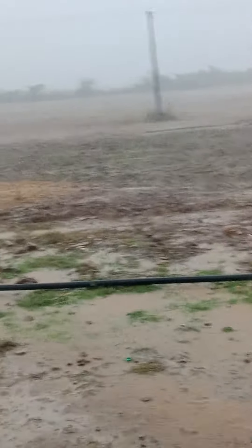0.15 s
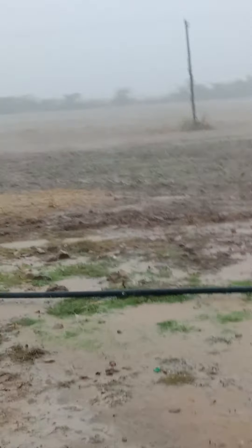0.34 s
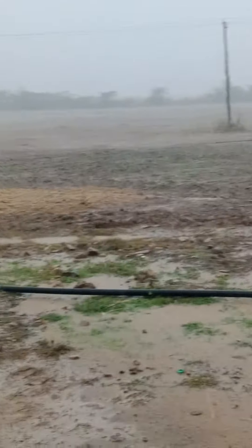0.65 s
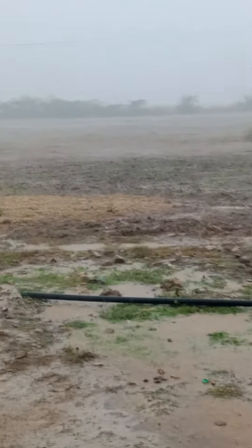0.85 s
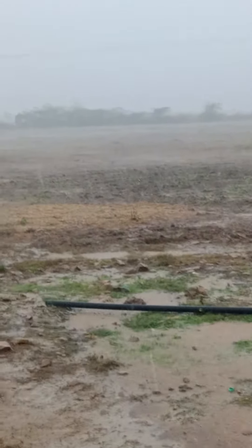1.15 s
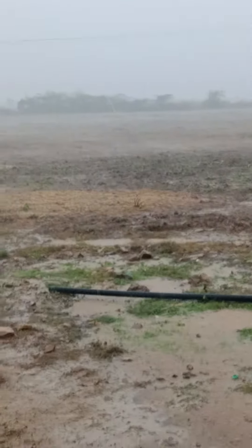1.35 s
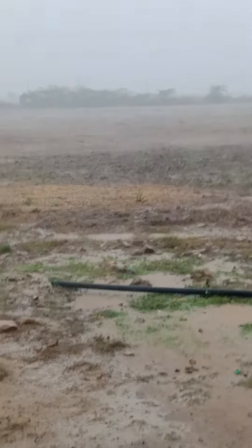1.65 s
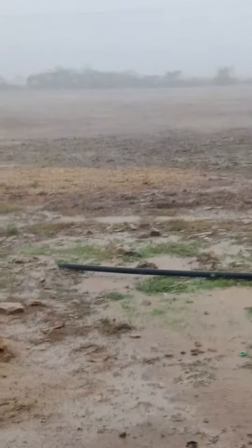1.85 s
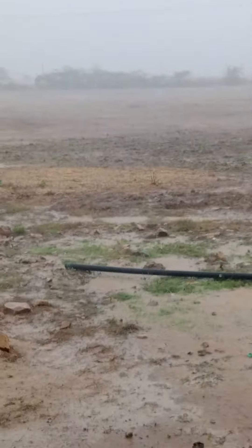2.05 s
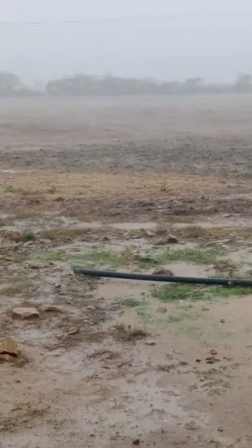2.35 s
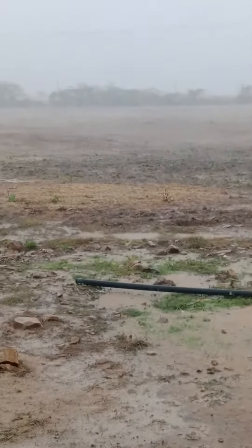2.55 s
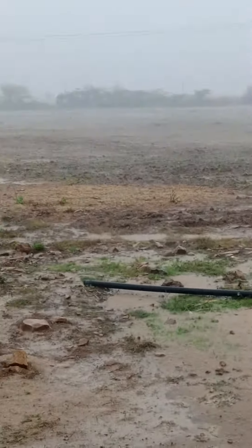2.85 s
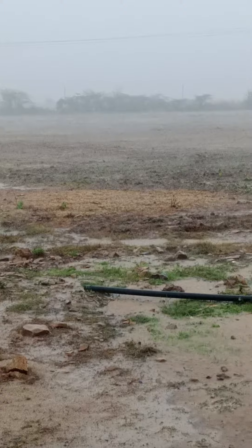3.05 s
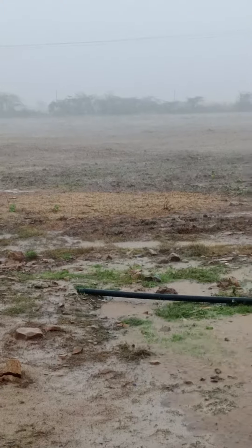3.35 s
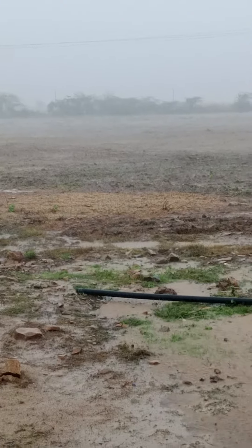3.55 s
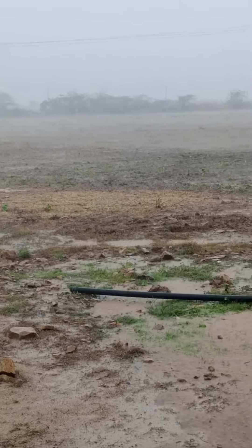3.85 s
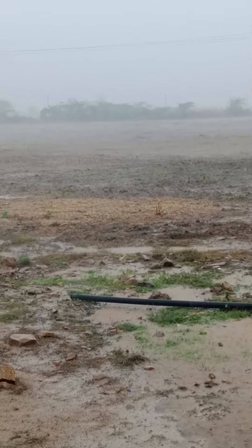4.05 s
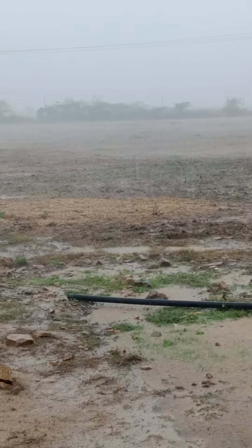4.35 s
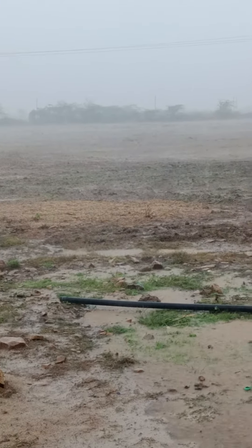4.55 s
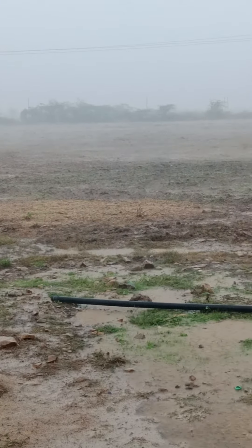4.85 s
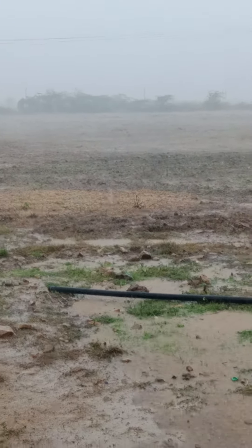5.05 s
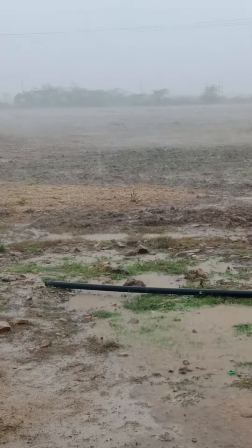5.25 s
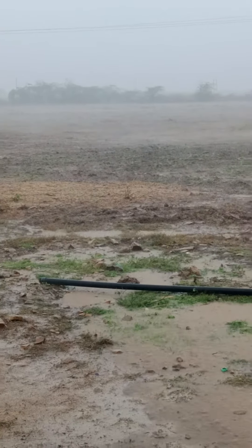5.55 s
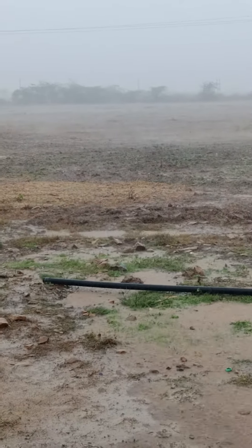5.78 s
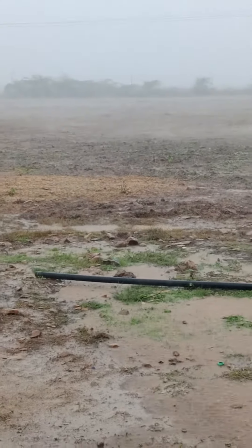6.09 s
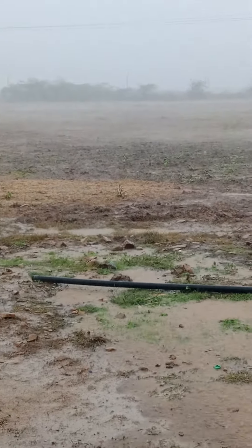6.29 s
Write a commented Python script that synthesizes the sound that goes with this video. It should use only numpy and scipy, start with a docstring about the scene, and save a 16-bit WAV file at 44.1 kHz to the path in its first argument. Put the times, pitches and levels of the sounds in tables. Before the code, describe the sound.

Heavy rain falls on an open, muddy field, countless drops ticking on wet soil and blurring into a bright hiss, with a watery wash farther off. A few drops crack close by and others splat softly into puddles. Wind hits the handheld microphone in short, low bursts, hardest in the first second, again around two seconds in, and once more near the end.

```python
"""A muddy field in heavy rain, on a handheld recorder. Countless drops tick on wet soil and blur into hiss, and
a patchy wash, its bands flicking between loud and soft, fills the middle range. Close to the microphone a few
drops crack and others splat into puddles. Eddies of wind hit the microphone port in short low gusts."""
import sys
import numpy as np
from scipy import signal
from scipy.fft import rfft, irfft, next_fast_len
from scipy.io import wavfile
from scipy.ndimage import uniform_filter1d, map_coordinates

SR = 44100
rng = np.random.default_rng(int(sys.argv[2]) if len(sys.argv) > 2 else 0)


def generate_wav(signal):
    """Clip the signal to [-1, 1] and save it as 16-bit WAV at the path in sys.argv[1]."""
    frames = np.transpose(np.atleast_2d(signal))
    scaled = np.clip(frames, -1, 1) * 32767
    pcm = np.round(scaled).astype(np.int16)
    wavfile.write(sys.argv[1], SR, pcm)


N = 283122

# The downpour. Each row: time in seconds, patter level in dB, wash in dB relative to the patter.
DOWNPOUR = [(0.0, -42.5, -12.5), (0.29, -40.5, -13), (1.14, -41, -14), (1.5, -37, -15),
            (1.84, -39.5, -13.5), (2.5, -36.5, -14.5), (2.75, -38, -14), (3.31, -38, -15), (3.93, -41, -14),
            (4.61, -40, -13.5), (5.38, -35.5, -15), (5.65, -36, -14.5), (6.42, -39, -13.5)]
# Colour of the wash. Each row: frequency in Hz, relative gain in dB.
WASH_COLOUR = [(500, -43), (750, -10.5), (1000, -3), (1300, -1), (1800, -8), (2100, -3.5), (2900, -3),
               (3250, -20), (4400, -25.5), (4900, -50)]
# Colour of the soaked field's low murmur. Each row: frequency in Hz, relative gain in dB.
MURMUR_COLOUR = [(30, -19), (70, 5.5), (150, 1), (350, -3), (700, -6.5), (1500, -17), (3000, -11.5),
                 (4000, -33.5), (4800, -67.5)]
# Colour of the hiss's lower edge. Each row: frequency in Hz, relative gain in dB.
EDGE_COLOUR = [(4300, -56), (4800, -34), (5500, -7.5), (6200, 2.5), (6600, -14), (7200, -30)]
# Gusts on the microphone port. Each row: start in seconds, length in seconds, level in dB ahead of
# the port and bass cut, treble loss in dB per 100 Hz (sign ignored).
PORT_GUSTS = [(0.003, 0.015, -9.5, 3.5), (0.034, 0.033, -17, 6), (0.084, 0.09, -29.5, 20.5),
              (.2, 0.048, -30, 8), (0.248, .07, -35, 15), (0.323, 0.071, -36.5, 14.5),
              (0.405, 0.16, -48, 25), (0.569, 0.03, -19, 7.5), (0.589, 0.049, -14, 3.5),
              (0.61, 0.0095, -13, 1.05), (0.653, 0.025, -21, 3), (.669, 0.034, -15.5, 3.5),
              (0.7, .049, -21, 4), (.727, .044, -20, 7.5), (0.74, 0.0099, -20, 1.5), (.8, .075, -39, 14),
              (.869, .055, -39.5, 24), (1.191, 0.12, -41, 37), (1.301, 0.048, -33, 10.5),
              (1.344, 0.15, -26, 10), (1.595, 0.058, -28, 12), (1.666, .047, -38, 12.5),
              (1.729, 0.084, -30.5, 10), (1.828, 0.034, -31.5, 10), (1.876, 0.07, -31, 15),
              (1.916, 0.1, -29, 9), (2.006, 0.066, -26.5, 8), (2.068, .037, -28, 9.5),
              (2.091, .11, -38, 10), (2.231, 0.085, -21.5, 7), (2.233, 0.059, -36.5, -0.5),
              (2.315, 0.08, -25.5, 8), (2.411, 0.079, -26.5, 8), (2.486, 0.077, -31, 14.5),
              (2.596, 0.077, -35.5, 12), (2.744, 0.092, -26.5, 29), (2.923, .044, -35.5, 21),
              (2.996, 0.1, -49.5, 9), (3.271, 0.067, -32.5, 16), (3.583, 0.066, -25.5, 9),
              (3.727, 0.076, -40.5, 32), (3.805, .042, -48, 8), (3.877, 0.05, -45.5, 17),
              (4.062, 0.056, -39.5, 11), (4.153, 0.066, -47.5, 24), (4.435, .037, -39.5, 24.5),
              (4.871, 0.077, -34.5, 9), (5.11, .05, -45, 18), (5.151, 0.055, -24.5, 5.5),
              (5.21, .06, -37, 12), (5.27, 0.043, -22.5, 11), (5.303, 0.17, -30.5, 7.5),
              (5.436, 0.093, -29.5, 11.5), (5.523, 0.099, -18.5, 5.5), (5.551, .045, -31, 0.5),
              (5.633, 0.078, -27.5, 11.5), (5.703, 0.058, -30, 13), (5.757, .11, -37, 18),
              (6.194, 0.067, -41.5, 18)]
# Splats in puddles close by. Each row: start in seconds, gain in dB, pitch in Hz.
PUDDLE_SPLATS = [(0.0564, -31.5, 2560), (0.262, -38.5, 2320), (2.2202, -36, 2600), (2.514, -37.5, 2220),
                 (3.355, -38, 2900), (5.759, -43, 2560), (5.822, -40, 2700), (5.841, -35, 2430),
                 (5.919, -43, 2210)]
# Drops near the microphone. Each row: start in seconds, gain in dB ahead of the patter's colour.
NEAR_DROPS = [(0.0649, -25.5), (0.1892, -30), (0.2279, -22.5), (0.399, -17.5), (0.483, -14.5),
              (0.4877, -21.5), (0.5782, -25), (0.637, -24.5), (0.9118, -24), (1.57, -23), (1.999, -16),
              (2.2199, -23), (2.4678, -25), (2.5132, -20.5), (2.6138, -17), (2.6828, -18.5),
              (3.1612, -23.5), (3.2274, -23.5), (3.2721, -22), (3.358, -21.5), (3.499, -26.5),
              (3.7638, -23.5), (3.893, -20.5), (3.9424, -23.5), (4.151, -20), (4.2487, -28), (4.445, -27.5),
              (4.48, -22), (4.6905, -23.5), (4.7743, -22.5), (4.9451, -20.5), (5.2446, -26), (5.55, -14),
              (5.5903, -17), (5.7892, -20.5), (6.3362, -17.5)]
# Colour of the patter through the microphone, which falls away steeply below 6 kHz. Each row: frequency in Hz,
# relative gain in dB.
PATTER_COLOUR = [(3000, -68), (4790, -47), (5490, -23), (6100, -20), (6540, -4.5), (7450, -1.5), (8600, -3),
                 (9350, -6.5), (10200, 1.5), (11500, -2.5), (12700, 2.5), (13900, -4.5), (15100, 0.5),
                 (16000, -4.5)]


def amp(db):
    """Gain of a level in dB."""
    return 10 ** (np.asarray(db) / 20)


def unit(x):
    """Scaled to rms 1."""
    return x / np.sqrt(np.mean(x ** 2) + 1e-20)


def filtered(x, response):
    """x through a filter given as gain against frequency in Hz."""
    size = next_fast_len(len(x) + 4096)
    return irfft(rfft(x, size) * response(np.fft.rfftfreq(size, 1 / SR)), size)[:len(x)]


def colour(points):
    """Response through (Hz, dB) points on a log frequency axis."""
    point_hz, db = np.transpose(points)
    return lambda hz: amp(np.interp(np.log(hz + 1), np.log(point_hz), db))


def wobble(rate):
    """A smooth random curve, rate knots a second."""
    return map_coordinates(rng.standard_normal(int(N * rate / SR) + 4), [np.arange(N) * rate / SR])


def patchy_noise(depth_db, band_hz, patch_s, abrupt):
    """Noise whose bands drift in gain, each on its own; abrupt ones flick between loud and soft."""
    hz, t, spectrum = signal.stft(rng.standard_normal(N), SR, nperseg=1024, noverlap=768)
    bands, patches = np.meshgrid(np.round(hz / band_hz), t / patch_s, indexing="ij")
    drift = map_coordinates(rng.standard_normal((200, 400)), [bands, patches], mode="wrap")
    gain = amp(depth_db * unit(np.tanh(abrupt * drift)))
    return signal.istft(spectrum * gain, SR, nperseg=1024, noverlap=768)[1][:N]


def splash(decay_s, noise):
    """One impact: a burst of noise that falls 60 dB in decay_s."""
    return noise * amp(-60 * np.arange(noise.shape[-1]) / SR / decay_s)


def downpour_db(column=1):
    """One column of the downpour per sample: 1 is the patter, 2 the wash relative to it."""
    rows = np.array(DOWNPOUR)
    return np.interp(np.arange(N) / SR, rows[:, 0], rows[:, column])


def gated_wash():
    """A patchy wash: narrow bands come and go with a watery flicker over an even murmur."""
    flicker = patchy_noise(depth_db=6.0, band_hz=119.85, patch_s=0.07, abrupt=1.7)
    wash = unit(filtered(flicker, colour(WASH_COLOUR)))
    murmur = amp(-10) * unit(filtered(rng.standard_normal(N), colour(MURMUR_COLOUR)))
    return amp(downpour_db() + downpour_db(column=2) + 0.56 * wobble(3)) * (wash + murmur)


def hiss_edge(below_patter_db=25):
    """Faint behind the patter, the lower edge of the hiss flickers band by band."""
    fizz = patchy_noise(depth_db=16.0, band_hz=198.0, patch_s=0.044, abrupt=3.2)
    level_db = downpour_db() - below_patter_db + 0.97 * wobble(6)
    return amp(level_db) * unit(filtered(fizz, colour(EDGE_COLOUR)))


def wind_on_port(rise_share=0.42, bass_cut_hz=95, port_hz=1800):
    """Gusts on the microphone are packets of eddies: low pressure noise, brighter when air hits hard."""
    out = np.zeros(N + 2 * SR)
    t = np.arange(-SR // 2, SR // 2) / SR
    for start, length, db, loss_db in PORT_GUSTS:
        rise, fall = rise_share * length, (1 - rise_share) * length
        rumble = lambda hz: amp(-abs(loss_db) * hz / 100) / np.sqrt(1 + (65 / (hz + 1)) ** 4)
        # the turbulence comes in fits a few milliseconds long
        fits = amp(2.32 * np.repeat(rng.standard_normal(SR // 300), 300))
        eddies = unit(filtered(fits * rng.standard_normal(SR), rumble))
        # successive eddies are of similar strength, steadier than plain noise
        power = np.abs(uniform_filter1d(eddies ** 2, size=900))
        eddies = unit(eddies / (power + 0.05) ** 0.37)
        # pressure goes with the square of air speed, which sharpens one side into spikes
        eddies = unit(eddies - 0.035 * (eddies ** 2 - 1))
        swell = amp(db - 10 * np.abs(t / np.where(t < 0, rise, fall)) ** 2.23)
        out[round((start + rise) * SR) + SR // 2:][:SR] += swell * eddies
    # the recorder's bass cut trims the slowest eddies, the port dulls the fastest
    bass_cut = lambda hz: 1 / np.sqrt(1 + (bass_cut_hz / (hz + 1)) ** 5.3)
    return filtered(out, lambda hz: bass_cut(hz) / (1 + (hz / port_hz) ** 4))[SR:SR + N]


def puddle_splats():
    """Drops land in puddles close by, each a soft noisy band round the pitch of its cavity."""
    out = np.zeros(N + SR)
    t = np.arange(3000) / SR
    attack = 1 - np.exp(-t / 0.0027)
    for start, db, pitch_hz in PUDDLE_SPLATS:
        band = unit(filtered(rng.standard_normal(len(t)), lambda hz: 1 / (1 + (hz / 800) ** 4)))
        cavity = np.sin(2 * np.pi * pitch_hz * t)
        out[round(start * SR):][:len(t)] += amp(db) * splash(0.05, band) * attack * cavity
    return filtered(out[:N], lambda hz: 1 / (1 + (hz / 4300) ** 12))


def near_drops():
    """A drop cracks near the microphone; its spray lands a moment later, softer and more spread."""
    out = np.zeros(N + SR)
    for start, db in NEAR_DROPS:
        crack, spray = rng.standard_normal((2, 900))
        lag = round(rng.uniform(0.0016, 0.0024) * SR)
        out[round(start * SR):][:len(crack)] += amp(db) * splash(0.0044, crack)
        out[round(start * SR) + lag:][:len(spray)] += amp(db) * 0.39 * splash(0.017, spray)
    return filtered(out[:N], colour(PATTER_COLOUR))


def patter(drops=8000):
    """Drops of unequal size and pitch tick on wet soil over the hiss of those too far to tell apart."""
    time_draw, size_draw, pitch_draw = np.hsplit(rng.random((drops, 3)), 3)
    strength = amp(np.minimum(-4.5 * np.log(size_draw + 1e-6), 15))
    pitch_hz = 6000 * (15500 / 6000) ** pitch_draw
    t = np.arange(256) / SR
    # a small splash is a wide band of noise round its own pitch
    band = uniform_filter1d(rng.standard_normal((drops, len(t))), size=7)
    bursts = strength * splash(0.0032, band) * np.sin(2 * np.pi * pitch_hz * t)
    positions = (time_draw * N).astype(int) + np.arange(len(t))
    ticks = unit(np.bincount(positions.ravel(), bursts.ravel())[:N])
    hiss = patchy_noise(depth_db=0.04, band_hz=1680, patch_s=0.06, abrupt=0.4)
    rain = unit(filtered(hiss + amp(-5.5) * ticks, colour(PATTER_COLOUR)))
    return amp(downpour_db() + 0.57 * wobble(6.5) + 0.6 * wobble(25)) * rain


def scene():
    """Rain near and far and wind on the port, in mono at the microphone."""
    return (patter() + hiss_edge() + gated_wash() + near_drops() + puddle_splats() + wind_on_port())[None]


def record(dry):
    """The microphone saturates softly on the hardest gusts; nothing is kept above the band limit."""
    overload, band_limit_hz = 0.55, 15720
    saturated = dry[0] / (1 + np.abs(dry[0] / overload) ** 4) ** (1 / 4)
    return filtered(saturated, lambda hz: hz < band_limit_hz)[None]


dry = scene()
out = record(dry)
generate_wav(out)
```